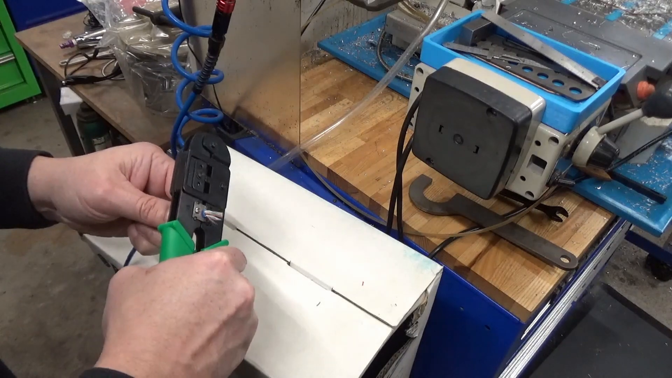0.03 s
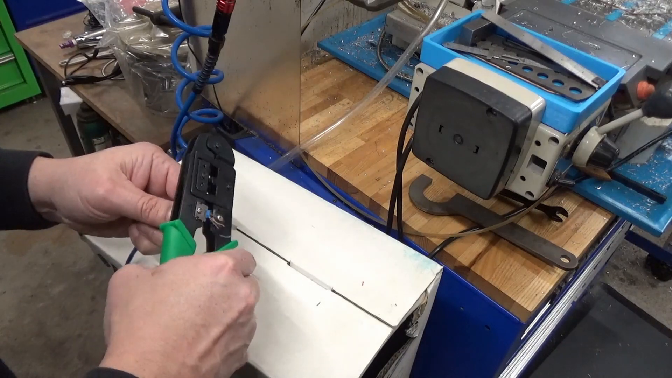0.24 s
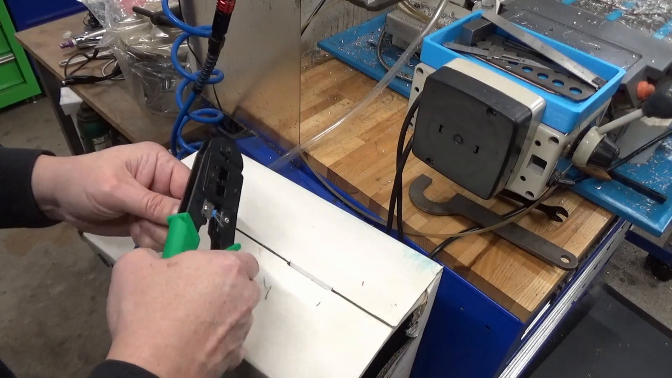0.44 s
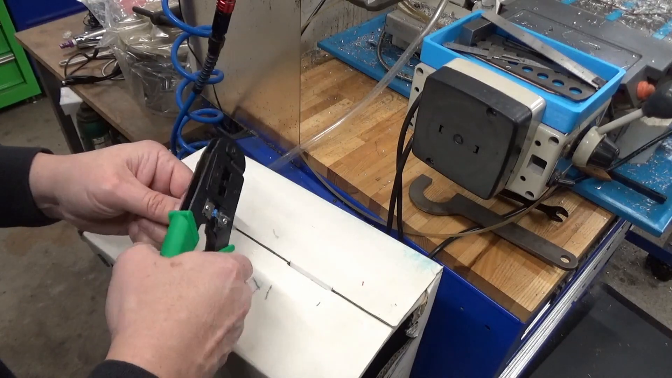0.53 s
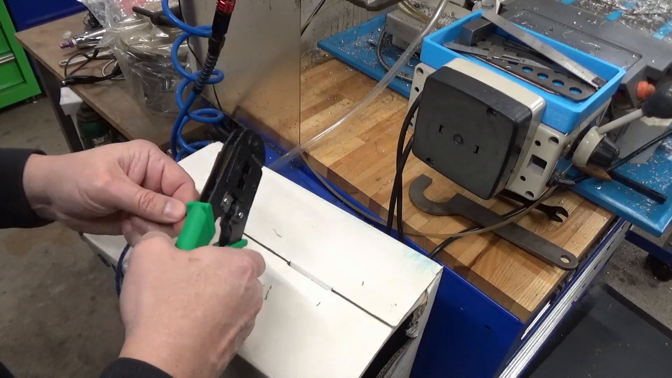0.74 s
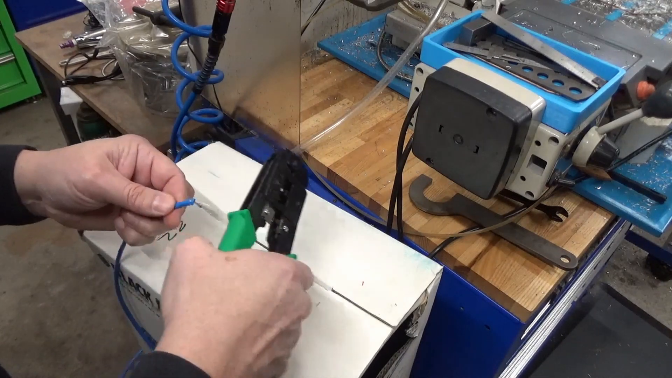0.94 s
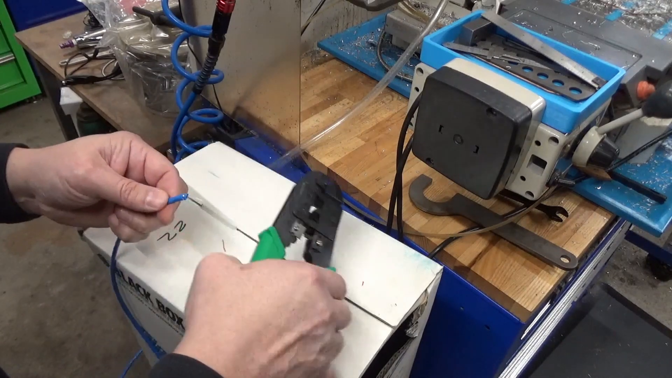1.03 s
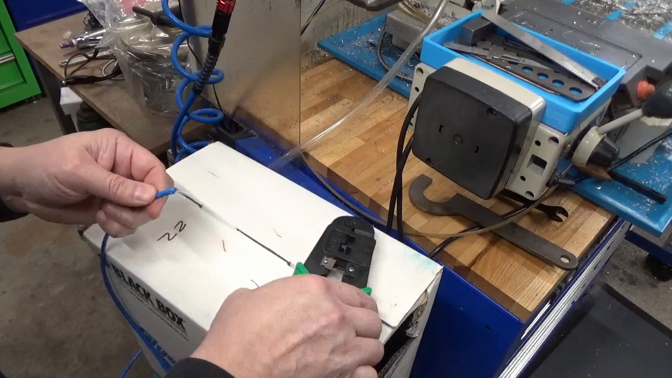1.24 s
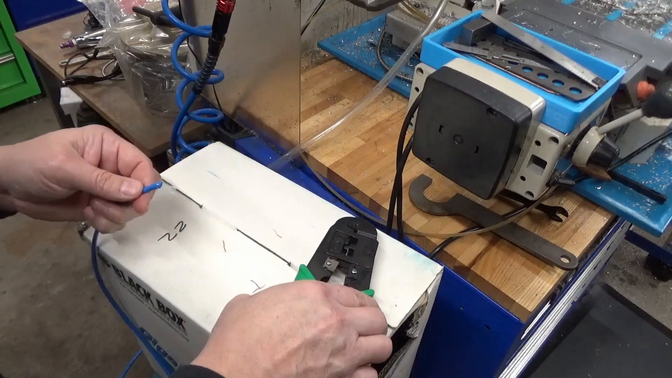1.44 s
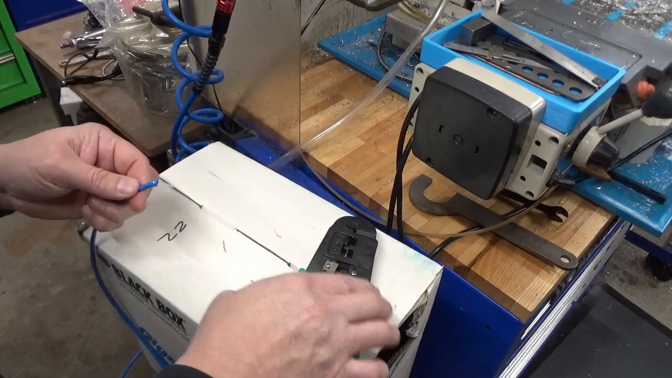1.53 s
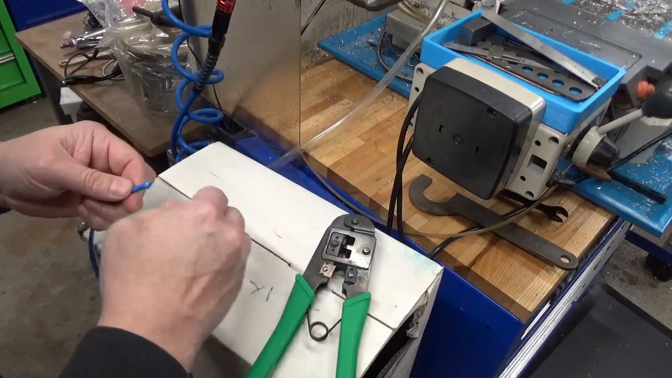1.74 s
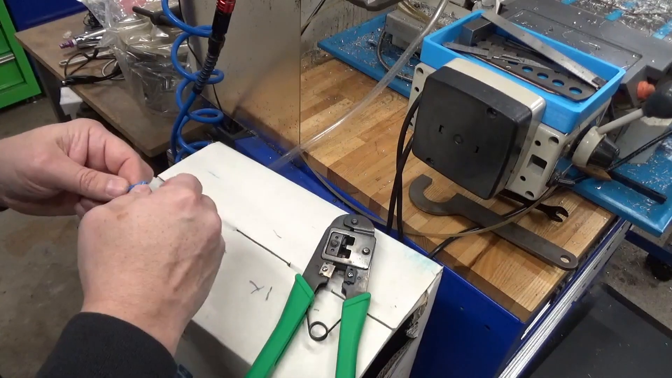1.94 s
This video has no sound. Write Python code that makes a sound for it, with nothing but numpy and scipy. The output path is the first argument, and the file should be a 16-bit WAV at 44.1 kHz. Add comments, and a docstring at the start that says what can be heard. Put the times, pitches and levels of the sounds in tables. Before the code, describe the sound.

A hand crimping tool gives sharp metallic clicks as a cable jacket snaps and scrapes off, then it is laid on a hollow cardboard box with dull knocks, close up in a small workshop.

```python
"""In a small workshop a hand crimping tool strips a cable, then is laid on a hollow cardboard box in a few knocks.
The steel jaws click as damped modes; the jacket snaps and scrapes off the wires in bursts of random slips.
Soft contacts excite the modes of the box; filtered noise gives light ticks, rubbing and sliding of the hands.
A decaying noise response forms the reverberation, over coloured air noise and a faint sinusoidal hum."""
import sys
import numpy as np
from scipy import signal
from scipy.fft import rfft, irfft, next_fast_len
from scipy.io import wavfile

SR = 44100
rng = np.random.default_rng(int(sys.argv[2]) if len(sys.argv) > 2 else 0)


def unload_wav(signal):
    """Save mono or channel-first audio to the path in sys.argv[1] as 16-bit WAV at rate SR, clipped to [-1, 1]."""
    wavfile.write(
        sys.argv[1],
        SR,
        np.round(np.clip(np.atleast_2d(signal).T, -1, 1) * 32767).astype(np.int16),
    )


N = 85995
TIME = np.arange(N) / SR   # s


def from_db(db):
    """Logarithmic level: 20 dB is a tenfold amplitude."""
    return 10 ** (np.asarray(db) / 20)


def rms_one(x):
    """Normalisation: the mean square becomes one."""
    return x / np.sqrt(np.mean(x ** 2) + 1e-20)


def at_hz(points, hz):
    """Interpolation of a table on a logarithmic frequency axis."""
    f, value = np.transpose(points)
    return np.interp(np.log(np.maximum(hz, 1)), np.log(f), value)


def level(points):
    """Amplitude envelope: levels joined linearly in dB, and -120 dB outside the rows."""
    return from_db(np.interp(TIME, *np.transpose(points), left=-120, right=-120))


def colour(x, points, tilt_db=0):
    """Minimum-phase filtering: the folded cepstrum gives a causal response; the tilt is in dB per octave."""
    n = x.shape[-1]
    size = 2 * next_fast_len(n // 2 + 2048)
    hz = np.arange(size // 2 + 1) * SR / size
    octaves = np.log2(np.clip(hz, 800, 12000) / 4000)
    gain = from_db(at_hz(points, hz) + tilt_db * octaves)
    cepstrum = irfft(np.log(gain))
    # fold negative times onto positive ones
    cepstrum[1:size // 2] *= 2
    cepstrum[size // 2 + 1:] = 0
    response = np.exp(rfft(cepstrum))
    return irfft(rfft(x, size) * response)[..., :n]


def high_pass(x, hz):
    """Second-order Butterworth filtering: the bass is attenuated below the corner."""
    return signal.sosfilt(signal.butter(2, hz, "high", fs=SR, output="sos"), x)


def add(out, s, sound):
    """Superposition: a sound is summed in at its start time."""
    i = int(s * SR)
    out[i:i + len(sound)] += sound[:N - i]


def ring(x, hz, t60, soft=False):
    """Damped resonator: a unit click rings it to about 1, at once or, after a soft contact, from rest."""
    radius = from_db(-60 / (t60 * SR))
    angle = 2 * np.pi * hz / SR
    drive = [0, np.sin(angle)] if soft else [.5, 0, -.5]
    return signal.lfilter(drive, [1, -2 * radius * np.cos(angle), radius * radius], x + 1e-18)


def strike(modes, times, weights_db, scatter_db, soft=False):
    """Modal superposition: weights_db(hz) sets how strongly each click excites a mode."""
    out = np.zeros(N)
    chance = rng.standard_normal((len(times), len(modes)))
    for k, (hz, db, t60) in enumerate(modes):
        clicks = np.zeros(N)
        clicks[(times * SR).astype(int)] = from_db(db + weights_db(hz) + scatter_db * chance[:, k])
        sign = 1 if soft else (-1) ** k   # a soft push moves all modes one way
        out += sign * ring(clicks, hz, t60, soft)
    return out


def near(hz, centre_hz):
    """Selective excitation: 1 at the centre pitch, falling to 1/e at 0.093 octave on both sides."""
    return np.exp(-(np.log2(hz / centre_hz) / 0.093) ** 2)


def burst(hold_s, fall_s, size=3000):
    """Random impulses: a rush of micro-contacts holds, then decays exponentially."""
    t = TIME[:size]
    return rng.choice([-1, 1], size) * np.exp(-np.maximum(t - hold_s, 0) / fall_s)


def stereo(mid, side, side_db):
    """Mid-side summation: two close microphones, alike in the bass, a little apart above."""
    return mid + from_db(side_db) * high_pass(side, 486) * np.array([[1], [-1]])


# spectral density of the room air [f/Hz, relative level/dB per Hz]
AIR_SPECTRUM = [(25, -7.5), (41, -2.5), (59, -26), (121, -5), (200, -11.5), (320, -10.5), (492, -16.5),
                (1260, -16.5), (2210, -22.5), (6600, -26.5), (11000, -30.5)]
AIR_DB, AIR_SIDE_DB = -60, -3
HUM_HZ, HUM_DB = 119.5, -70.5


def background():
    """Stationary noise and a pure tone: coloured room air with a steady mains hum."""
    air = from_db(AIR_DB) * rms_one(colour(rng.standard_normal((2, N)), AIR_SPECTRUM))
    hum = from_db(HUM_DB) * np.sqrt(2) * np.sin(2 * np.pi * HUM_HZ * TIME)
    return stereo(*air, AIR_SIDE_DB) + hum


# reverberation time of the room [f/Hz, t60/s]
REVERBERATION_TIME = [(150, 0.49), (600, 0.31), (3000, 0.43), (11000, 0.36)]
# spectral balance of the reverberant tail [f/Hz, gain/dB]
REVERBERATION_COLOUR = [(100, -4.5), (600, -0.5), (3000, -2), (11000, -8)]
ROOM_DB, ROOM_SIDE_DB = -13, -6.5
BENCH_DB, BENCH_FALL_S, BENCH_SIDE_DB = -9.5, 0.0082, -5.5


def workshop(x, size=26000):
    """Reverberation by convolution: quick bench reflections, then a tail that decays band by band."""
    t = TIME[:size]
    edges = np.geomspace(60, 15000, 9)   # Hz
    white, tail = rng.standard_normal((2, size)), 0
    for low, high in zip(edges, edges[1:]):
        band_filter = signal.butter(2, [low, high], "band", fs=SR, output="sos")
        band = signal.sosfilt(band_filter, rng.standard_normal((2, size)))
        tail = tail + band * from_db(-60 * t / at_hz(REVERBERATION_TIME, np.sqrt(low * high)))
    build_up = np.clip(t / 0.014 - .5, 0, 1)   # from 7 to 21 ms
    tail = colour(rms_one(tail * build_up), REVERBERATION_COLOUR)
    early = rms_one(white * np.exp(-t / BENCH_FALL_S) * (t > .0012))
    response = from_db(ROOM_DB) * stereo(*tail, ROOM_SIDE_DB)
    response = response + from_db(BENCH_DB) * stereo(*early, BENCH_SIDE_DB)
    return signal.fftconvolve(x[None], response / np.sqrt(size), axes=1)[:, :N]


# light ticks of fingers, cable and spring [t/s, level before colouring/dB]
TICK_EVENTS = [(0.1202, -52), (.127, -52), (0.2134, -44), (0.231, -46.5), (.9352, -46.5), (1.302, -42.5),
               (1.6083, -31), (1.6217, -27.5), (1.625, -38), (1.6453, -31.5), (1.688, -41), (1.7282, -35),
               (1.7401, -55.5), (1.757, -45.5), (1.7993, -44), (1.8391, -49), (1.868, -52)]
# spectral balance of the ticks [f/Hz, gain/dB]
TICK_SPECTRUM = [(200, -66), (1500, -25), (4300, 2.5), (5600, -5), (8200, 3.5), (11000, -7.5)]
# envelope of hand and tool rubbing on the box [t/s, level/dB]
RUB_ENVELOPE = [(.85, -78), (1.05, -61.5), (1.25, -55), (1.35, -50), (1.44, -60.5), (1.52, -52.5),
                (1.58, -59), (1.68, -48), (1.80, -63.5), (1.92, -83)]
# spectral balance of the rubbing [f/Hz, relative gain/dB]
RUB_SPECTRUM = [(50, -10), (130, 4.5), (260, 4), (355, 16), (440, 2.5), (620, 8), (1000, -3), (3000, -8.5),
                (11000, -21)]
# skin sliding off the grips [centre t/s, level before colouring/dB, half length to 1/e/s]
SLIDE_EVENTS = [(1.364, -54.5, 0.043), (1.519, -47, 0.018), (1.666, -53.5, 0.0223)]
# spectral balance of the sliding [f/Hz, gain/dB]
SLIDE_SPECTRUM = [(300, -5), (1800, 1), (3000, 3.5), (5000, 2), (9000, 6.5), (11000, -9)]


def hands():
    """Friction and light impact as filtered noise: small ticks, a dull rub on the box, skin on the grips."""
    ticks = np.zeros(N)
    for s, db in TICK_EVENTS:
        add(ticks, s, from_db(db) * burst(hold_s=0.00089, fall_s=0.0012))
    rub = level(RUB_ENVELOPE) * rms_one(colour(rng.standard_normal(N), RUB_SPECTRUM))
    swell = sum(from_db(db) * np.exp(-((TIME - s) / half_s) ** 2) for s, db, half_s in SLIDE_EVENTS)
    slide = swell * colour(rng.standard_normal(N), SLIDE_SPECTRUM)
    return colour(ticks, TICK_SPECTRUM) + rub + slide


# knocks on the box [t/s, level/dB, bass/dB, upper modes/dB, favoured f of the struck spot/Hz, clink level/dB]
KNOCK_EVENTS = [(.001, -57, -32.5, -15, 324, -67), (1.1965, -48.5, -27, -7.5, 378, -65),
                (1.2942, -38.5, 0, 4, 598, -26), (1.3770, -40, 3, 2.5, 598, -25.5),
                (1.459, -51, -5, -7, 376, -66), (1.5263, -36, -21, -0.5, 328, -33),
                (1.6085, -36.5, -8, 4.5, 874, -41), (1.6191, -26, 0.5, -12, 454, -22.5),
                (1.6285, -32, 4.5, -5, 141, -40), (1.6450, -38.5, -5, 8.5, 331, -42),
                (1.706, -53, 12.5, -11, 172, -70), (1.7292, -44.5, 0, 5.5, 758, -38.5)]
# modes of the hollow box [f/Hz, level/dB, t60/s]
BOX_RESONANCES = [(121, -20, 0.247), (144.4, -6, 0.17), (172.7, -9.5, 0.2), (235.3, -7, 0.13),
                  (330, -4.5, 0.13), (375.4, -3, 0.097), (452.6, -3.5, 0.069), (535, -3.5, .12),
                  (576, -5.5, 0.12), (752, -9, .05), (867, -12, .04), (1228, -14.5, 0.067),
                  (1608, -17.5, 0.12)]
# modes of steel meeting cardboard [f/Hz, level/dB, t60/s]
CLINK_RESONANCES = [(2150, -7, 0.0086), (2910, -1, 0.0067), (4530, -12, 0.0043)]
# spectral balance of the yielding cardboard [f/Hz, gain/dB]
CRUNCH_SPECTRUM = [(30, -6), (70, 2), (130, 7), (450, 3), (800, 4), (1500, 1), (4000, -6), (11000, -16.5)]
BASS_HZ, MIDDLE_HZ, UPPER_HZ = 179, 365, 616
BOX_SCATTER_DB, SPOT_DB, RADIATES_FROM_HZ = 3, 9.5, 130
CRUNCH_DB, CRUNCH_FALL_S = 0, 0.0096


def box():
    """Soft-contact modal excitation: each knock rings the box, crunches its surface and makes the steel clink."""
    s, db, bass, upper, spot_hz, clink = np.transpose(KNOCK_EVENTS)

    def weights_db(hz):
        bass_share = at_hz([(BASS_HZ, 1), (MIDDLE_HZ, 0)], hz)
        upper_share = at_hz([(MIDDLE_HZ, 0), (UPPER_HZ, 1)], hz)
        return db + bass * bass_share + upper * upper_share + SPOT_DB * near(hz, spot_hz)

    body = strike(BOX_RESONANCES, s, weights_db, BOX_SCATTER_DB, soft=True)
    body = high_pass(body, RADIATES_FROM_HZ)
    clinks = strike(CLINK_RESONANCES, s, lambda hz: clink, scatter_db=1)
    crunch = np.zeros(N)
    for start, knock_db in zip(s, db):
        add(crunch, start, from_db(knock_db + CRUNCH_DB) * burst(0, CRUNCH_FALL_S))
    return body + clinks + colour(crunch, CRUNCH_SPECTRUM)


# bursts of tiny slips as the jacket gives way [t/s, level before colouring/dB, hold/s, tilt/dB per octave]
SNAP_EVENTS = [(0.2908, -20, 0.00065, 1.5), (.2930, -15.5, 0.0012, 1), (0.298, -39, 0.0023, -4),
               (0.3294, -35, 0.0016, -2.5), (0.3634, -34.5, 0.0015, -7), (0.411, -28.5, 0.0032, 1),
               (0.4143, -29.5, 0.00063, 1.5), (.4240, -28.5, 0.0018, 6.5), (.4456, -29.5, .0006, 9),
               (.4497, -21.5, 0.0013, -1), (.4525, -32.5, 0.0043, -3), (0.4749, -28, 0.0013, 2.5),
               (0.477, -30, 0.0018, -1.5), (0.4905, -39, 0.0016, 4.5), (0.5065, -37, 0.0014, -1.5),
               (0.514, -40.5, 0.0012, 2), (0.535, -37.5, 0.0015, -2.5), (0.54, -35.5, 0.00042, 5.5),
               (0.55, -45.5, 0.001, 3.5), (.5587, -38.5, .001, 2), (0.5654, -39.5, 0.00031, 1),
               (.5870, -41, 0.0013, -0.5), (.6022, -44.5, 0.00072, -0.5)]
# spectral balance of the snaps [f/Hz, gain/dB]
SNAP_SPECTRUM = [(100, -29), (250, -9.5), (600, -7.5), (1500, -2), (2400, -2), (3000, 4.5), (4400, 3),
                 (5100, 3), (6400, 2.5), (8100, 5.5), (9500, -1), (11000, -3.5)]
# envelope of the jacket dragging along the wires [t/s, level before colouring/dB]
DRAG_ENVELOPE = [(.235, -51.5), (.288, -37.5), (.300, -40), (.335, -43.5), (.375, -59), (.400, -53),
                 (.418, -39.5), (.465, -43.5), (.500, -48), (.550, -45.5), (.600, -52), (.650, -58)]
# spectral balance of the dragging [f/Hz, gain/dB]
DRAG_SPECTRUM = [(100, -31), (250, 8), (700, 5), (1500, 5), (2400, 2.5), (3400, 0.5), (5500, 1.5),
                 (7500, 0), (11000, -10.5)]
# modes of the steel tool, shaken here and struck by the jaws [f/Hz, level/dB, t60/s]
TOOL_RESONANCES = [(266, -30.5, 0.04), (601, -20, 0.11), (862, -22.5, 0.027), (992, -21.5, 0.046),
                   (1470, -3, 0.0047), (2175, -19, 0.025), (3030, -3, 0.014), (3110, -31, .03),
                   (3595, -3, 0.0086), (4460, -3, .009), (5230, -7.5, 0.0042), (6400, -26, 0.0061),
                   (7400, -21, .007), (9770, -12, 0.0044)]
SNAP_FALL_S, SNAP_RING_DB = 0.00099, -35.5
DRAG_SLIPS_PER_S, DRAG_SPREAD_DB = 3100, 5.5


def jacket():
    """Stick-slip friction: the jacket snaps, shaking the tool, and crackles as it is dragged off."""
    snaps = np.zeros(N)
    for s, db, hold_s, tilt_db in SNAP_EVENTS:
        add(snaps, s, from_db(db) * colour(burst(hold_s, SNAP_FALL_S), SNAP_SPECTRUM, tilt_db))
    shaken = sum(from_db(db) * ring(snaps, hz, t60) for hz, db, t60 in TOOL_RESONANCES)
    # sparse slips of random sign and strength
    happens = rng.random(N) < DRAG_SLIPS_PER_S / SR
    sign = rng.choice([-1, 1], N)
    strength = from_db(DRAG_SPREAD_DB * np.minimum(rng.exponential(1, N), 4))
    slips = rms_one(happens * sign * strength)
    drag = level(DRAG_ENVELOPE) * colour(slips, DRAG_SPECTRUM)
    return snaps + from_db(SNAP_RING_DB) * shaken + drag


# clicks of the jaws [t/s, level/dB, treble tilt/dB per octave, extra strength of the main ring/dB]
JAW_EVENTS = [(0.2388, -16, -1, -0.5), (0.2652, -13.5, 0.5, -0.5), (.2842, -16.5, -2.5, -19),
              (.3303, -30.5, 4.5, 16.5), (.3538, -37, -4.5, -4), (0.3635, -25.5, 0.5, -7),
              (0.4026, -29.5, 3, 8), (.4133, -25.5, -3, 9), (0.5219, -29.5, 0, -25), (0.5265, -37, -1, -14)]
JAW_RING_HZ, JAW_TILT_FROM_HZ = 2932, 960
JAW_CRACK_DB, JAW_SCATTER_DB = -14.5, 0.5


def jaws():
    """Impact of steel on steel: a sharp crack and a modal ring damped quickly by the hand."""
    s, db, tilt, main = np.transpose(JAW_EVENTS)

    def weights_db(hz):
        octaves = np.log2(max(hz, JAW_TILT_FROM_HZ) / JAW_RING_HZ)
        return db + tilt * octaves + main * near(hz, JAW_RING_HZ)

    cracks = np.zeros(N)
    for start, click_db in zip(s, db):
        add(cracks, start, from_db(click_db + JAW_CRACK_DB) * burst(hold_s=0.00099, fall_s=0.00067))
    return strike(TOOL_RESONANCES, s, weights_db, JAW_SCATTER_DB) + cracks


def scene():
    """Direct and reverberant sound: tool, cable, box and hands, close and central, in the workshop."""
    close = jaws() + jacket() + box() + hands()
    return close + workshop(close) + background()


def record(dry):
    """Band limitation: an elliptic low-pass cuts the top steeply above 11.1 kHz."""
    low_pass = signal.ellip(10, .2, 75, 11100, fs=SR, output="sos")   # 0.2 dB ripple, 75 dB stopband
    return signal.sosfilt(low_pass, dry)


dry = scene()
out = record(dry)
unload_wav(out)
```